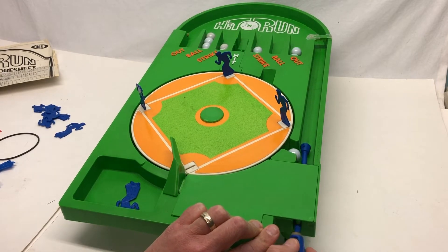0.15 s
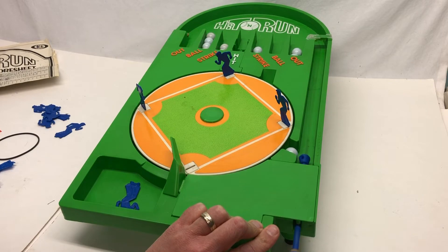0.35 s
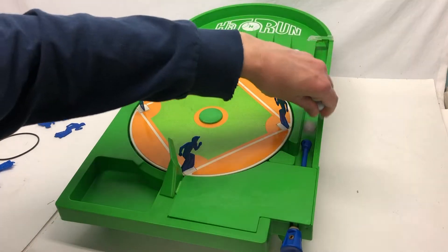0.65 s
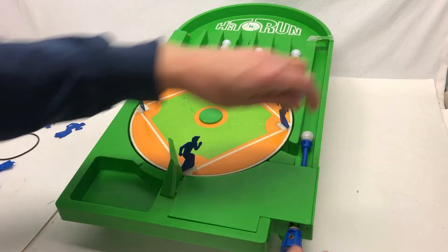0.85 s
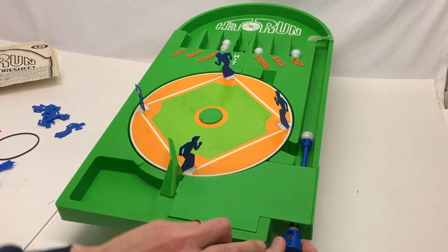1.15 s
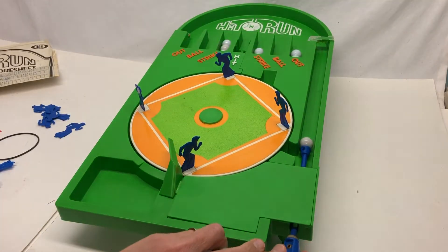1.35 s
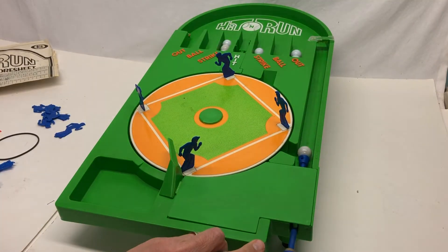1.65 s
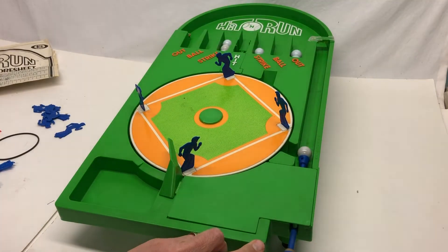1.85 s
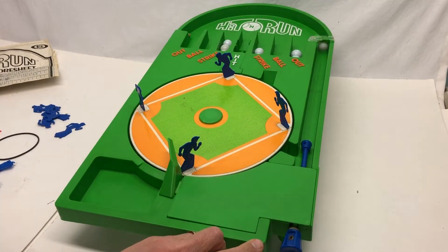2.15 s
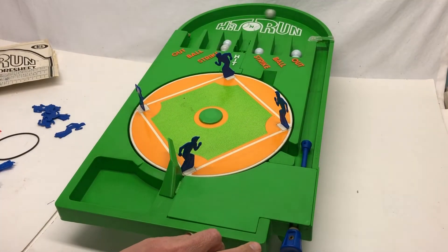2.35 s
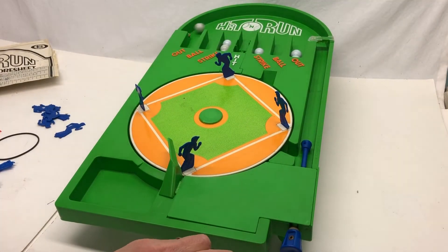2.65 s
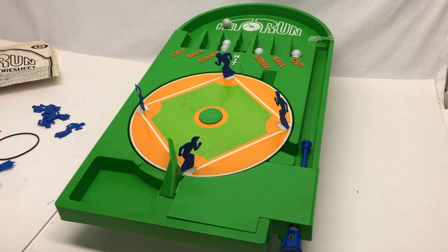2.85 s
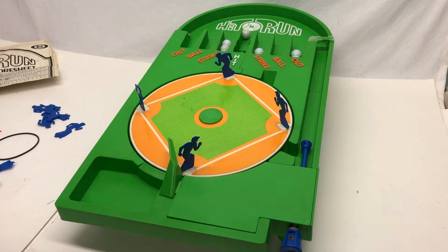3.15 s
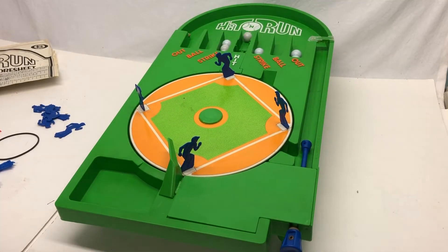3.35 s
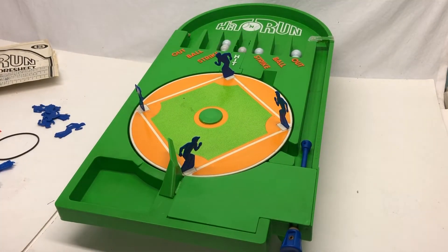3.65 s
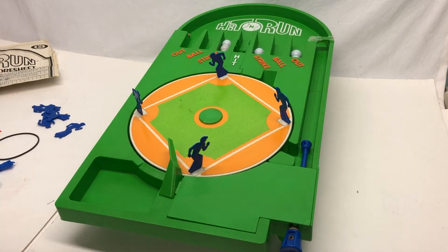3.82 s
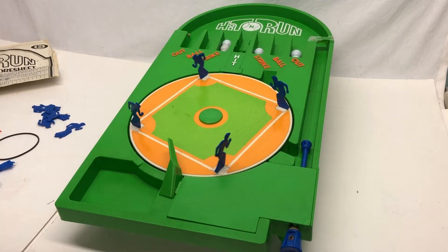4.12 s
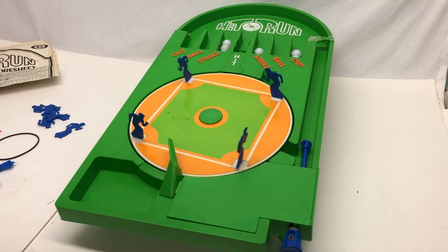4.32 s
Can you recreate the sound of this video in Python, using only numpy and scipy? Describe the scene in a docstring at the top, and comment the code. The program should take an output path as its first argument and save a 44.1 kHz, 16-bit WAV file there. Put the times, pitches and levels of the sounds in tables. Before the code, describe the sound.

Close up in a small quiet room, a sleeve rustles and a plastic shooter clicks. A marble drops in its lane with quick bounces. After a near-quiet pause the spring plunger fires with a rattling snap, the marble rolls round the arch, slows, knocks between plastic dividers, and a turntable trips with hollow clacks over a faint low hum.

```python
"""A plastic tabletop pinball baseball game, heard close up in a small room with a low hum.
A sleeve rustles (shaped noise) while the spring shooter clicks, snaps and is cocked; a marble drops
in its lane and bounces. The shooter fires, the marble rolls round the arch (speed-driven noise),
knocks between the dividers, then trips the turntable that moves the runners.
Each blow mixes noise, fading band by band, with the ringing notes of the thin plastic tray."""
import sys
import numpy as np
from scipy import signal
from scipy.fft import rfft, irfft, next_fast_len
from scipy.io import wavfile
from scipy.ndimage import map_coordinates

SR = 44100
rng = np.random.default_rng(int(sys.argv[2]) if len(sys.argv) > 2 else 0)


def waveform_to_disk(signal):
    """Save audio, clipped to [-1, 1], as 16-bit WAV at the path in sys.argv[1]."""
    frames = np.transpose(np.atleast_2d(signal))
    scaled = np.clip(frames, -1, 1) * 32767
    samples = np.round(scaled).astype(np.int16)
    wavfile.write(sys.argv[1], SR, samples)


N = 197580  # length of the scene in samples

# Blows on the tray. Columns: t/s, relative level/dB, hardness/dB (harder is brighter)
# The shooter's plunger clicks in its guide
PLUNGER_CLICKS = [(0.0062, -35.5, 2.5), (0.169, -31, -1.5), (0.3182, -40, -0.5), (0.9283, -59, 6.5),
                  (0.9527, -56, 6), (1.2261, -44.5, -0.5), (1.259, -44, -10)]
# Hard plastic snaps against plastic
PLASTIC_SNAPS = [(0.2603, -39, 0), (1.4995, -38, 1.5), (2.1448, -36.5, -1)]
# The marble falls in the lane and bounces
MARBLE_DROP = [(0.6215, -24, -2), (0.6365, -26.5, 1), (0.6554, -20.5, 2.5), (0.7, -35, -4),
               (0.7203, -26, 3.5), (0.7487, -31, -1), (0.7675, -43.5, 4.5), (0.796, -54, 5),
               (0.808, -52, -3)]
# Loose parts under the board, mostly the turntable
LOOSE_CLACKS = [(1.131, -39, -8), (3.692, -37.5, -6.5), (3.7218, -29, -1), (3.7469, -29.5, 1),
                (3.779, -38, -6), (3.8314, -39, 3), (3.854, -35, -11), (3.892, -44.5, -12),
                (3.915, -34, -15), (3.9562, -24.5, 3.5), (3.981, -36, 5), (3.9946, -26.5, 3.5),
                (4.0161, -25.5, 0), (4.025, -49, 19), (4.049, -39.5, -0.5), (4.087, -37.5, -4.5),
                (4.1625, -40.5, -13.5), (4.204, -53, -9), (4.2262, -35.5, -7), (4.299, -48.5, -19),
                (4.377, -55, -7), (4.44, -46, -10)]
# The plunger flies forward and chatters
PLUNGER_SHOT = [(1.947, -49.5, -1.5), (1.979, -34, 1.5), (1.988, -26, 2.5), (1.9945, -28, -3),
                (2.006, -27.5, 2.5), (2.018, -31.5, 2.5), (2.029, -37.5, 1.5)]
# The marble hits rim and dividers
MARBLE_KNOCKS = [(2.0697, -41, 7), (2.1375, -41.5, 13), (2.199, -38.5, 6), (2.237, -36, -15),
                 (2.2887, -37, -6), (2.395, -32.5, 0.5), (2.4264, -35.5, 1), (2.5187, -33.5, 2),
                 (2.5446, -37.5, -10), (2.597, -35, -17), (2.6628, -24, 6.5), (2.685, -29, 3.5),
                 (2.7546, -40, -2.5), (2.909, -44, -4), (2.9198, -41.5, -1), (3.014, -56, -2),
                 (3.0664, -45, -4.5), (3.1504, -26.5, 0.5), (3.2003, -19, 0.5), (3.215, -39, 5.5),
                 (3.26, -69, 21), (3.3049, -30, -4), (3.5845, -42.5, 7.5), (3.6007, -28.5, -3),
                 (3.6451, -21, -1.5), (3.66, -33.5, 3)]

# The tray's four bands: knock, body, crack and tick. Columns: low f/Hz, high f/Hz
TRAY_BANDS = [(120, 700), (700, 2200), (2200, 7000), (7000, 17000)]
# Slow bending waves arrive late and last long; one row per band.
# Columns: rise/s, time to fall 60 dB/s (before each part's own damping)
BENDING_WAVES = [(0.0074, 0.087), (0.0051, 0.065), (0.0011, 0.064), (.00025, 0.052)]
# The tray's ringing notes. Columns: f/Hz, relative level/dB, time to fall 60 dB/s
TRAY_NOTES = [(363.2, -4.5, 0.17), (535.4, -6.5, 0.15), (654, -15, 0.071), (882, -9.5, 0.28),
              (920, -2, 0.12), (1070, -2.5, 0.066), (1320, -2, 0.028), (1323, -1.5, .09),
              (1510, -18.5, 0.045), (2140, -9.5, 0.059), (2420, -6, 0.09), (2370, -12.5, 0.11),
              (3560, -17.5, .08), (3970, -20, 0.039), (4900, -13, 0.06), (4800, -25.5, .08)]

# Tone colours of the blows and noises. Columns: f/Hz, relative level/dB
# Still room air
AIR_COLOUR = [(15, -28.5), (25, -0.5), (92, -14.5), (200, 10.5), (384, 2), (451, -5), (1100, -11.5),
              (7920, -16.5), (13200, -17), (14400, -22.5), (16000, -42)]
# Sleeve cloth
CLOTH_COLOUR = [(60, -28), (110, -12.5), (190, -13.5), (380, -2.5), (470, -8), (620, -9.5), (1050, -12),
                (1650, -15), (2080, -16), (2700, -21.5), (4400, -18), (5300, -25.5), (9500, -33.5),
                (16000, -44.5)]
# Plunger clicks
CLICK_COLOUR = [(150, -45), (250, -19), (618, -8.5), (875, -0.5), (2440, -13.5), (3840, -7.5), (4410, -15),
                (4820, -4), (5440, -11), (6250, -8), (8120, -25.5), (9330, -21.5), (13000, -36),
                (14700, -37), (16000, -36.5)]
# Plastic snaps
SNAP_COLOUR = [(250, -14), (380, -4), (1100, -2), (2000, -3.5), (2550, -13), (3000, 3.5), (3500, -2),
               (4000, 4), (5000, -5.5), (6600, -5.5), (8200, -11.5), (11500, -10), (14000, -3),
               (16000, -11)]
# Marble drop
DROP_COLOUR = [(88, -61), (150, -31), (534, -10), (790, -11), (854, -4.5), (1210, -6.5), (1830, -9.5),
               (2180, -20), (3490, -10), (4160, -14.5), (4950, -8), (5910, -19.5), (6910, -12.5),
               (14000, -27), (16000, -31)]
# Loose parts
CLACK_COLOUR = [(120, -45), (200, -18.5), (416, 1), (612, -3.5), (1270, 0.5), (1480, -19), (2020, -11.5),
                (2170, -20), (2380, -24), (3490, -26.5), (4120, -26.5), (4770, -31), (6640, -32.5),
                (8420, -37), (16000, -48)]
# Plunger shot
SHOT_COLOUR = [(88, -57), (150, -32), (376, -11), (457, -16), (534, 2.5), (871, -15), (998, 1.5),
               (1100, -14.5), (2400, -11.5), (2600, -2.5), (2760, -14), (3040, -1.5), (3550, -8.5),
               (4580, -6), (16000, -24)]
# Rumble of the rolling marble
ROLL_COLOUR = [(60, -46.5), (170, -9), (280, -22.5), (360, -0.5), (450, -4), (560, 2), (900, -3.5),
               (1300, 0), (1700, -7), (2400, -10), (3200, -8), (5000, -43.5)]
# Grit of rolling and rubbing
GRIT_COLOUR = [(1180, -53), (2000, -4), (2640, -6), (3710, 2.5), (4050, 1), (6640, -3), (8400, -10.5),
               (14700, -23), (16000, -24)]
# Marble knocks
KNOCK_COLOUR = [(88, -59), (150, -56), (354, -23), (759, -4.5), (888, 11.5), (1140, 6), (1450, 0),
                (1940, 0.5), (2700, -14), (4080, -11), (4490, -14.5), (6510, -19), (9440, -28),
                (15100, -35), (16000, -41)]
# Rumble of rubbing parts
RUB_COLOUR = [(100, -35), (250, -7), (380, -0.5), (950, 3.5), (1400, -9), (2400, -6.5), (5000, -34)]
# Hiss of sliding plastic
SWISH_COLOUR = [(800, -34.5), (2000, 3.5), (4500, 3.5), (6800, -3.0), (8300, -6), (11000, -8.5),
                (16000, -15.5)]
# Level of the room's tail
ROOM_COLOUR = [(200, -10), (1000, -14.0), (4000, -13.5), (14000, -15)]

# Sounds that swell and fade. Columns: peak t/s, level/dB, rise/s, fall/s (both over 20 dB)
# The low hum
HUM_SWELLS = [(0.0, -59, 0.1, 0.4), (1.56, -64.5, 0.15, 0.45), (2.1, -68, 0.2, 1.7),
              (4.28, -58.5, 0.95, 0.46)]
# The spring rubs while it is held
SPRING_SWELLS = [(0.86, -58.5, 0.05, 0.53), (1.52, -62.5, 0.41, 0.31)]
# The plunger, then the turntable, rub on the tray
RUB_SWELLS = [(2.0, -31.5, 0.048, 0.059), (3.97, -41, 0.1, 0.12), (4.28, -59.5, 0.32, 3.6)]
# Faint, smooth slides of plastic
SWISH_SWELLS = [(3.46, -62, 0.087, 0.11), (4.3, -72.5, 2.7, 3)]

# Sleeve and hands on the toy. Columns: start t/s, end t/s, relative level/dB, time to fade 60 dB/s
SLEEVE_RUSTLE = [(0.0, 0.396, -56, 0.018), (0.795, 1.512, -53.5, 0.79)]
# Soft bumps of hand and tray on the table. Columns: t/s, relative level/dB, starting f/Hz
SOFT_BUMPS = [(0.659, -38.5, 190), (0.661, -37, 95), (0.72, -31.5, 81), (0.793, -32.5, 265),
              (.859, -29.5, 345), (0.87, -32, 229), (.879, -34, 128), (1.502, -60.5, 80),
              (1.998, -46.5, 120), (2.008, -33.5, 65), (2.613, -21, 432), (2.663, -38, 131),
              (2.691, -39.5, 70)]
# On the hardest blows the struck wall sounds its own note. Columns: t/s, level/dB, f/Hz
WALL_NOTES = [(0.6228, -9, 2580), (0.6551, -8, 5140), (0.72, -13, 5170), (3.153, -15, 2300),
              (3.201, -19.5, 1193), (3.6451, -14, 2370)]
# The turntable's stiff lever trips. Columns: t/s, peak level/dB, f/Hz
LEVER_TRIPS = [(3.7224, -10, 1450), (3.7395, -12.5, 1410), (3.7467, -13, 1730), (3.956, -13.5, 1400),
               (3.9938, -13, 1300), (4.0167, -14, 1300), (4.05, -19.5, 1190), (4.163, -37.5, 1030),
               (4.2268, -31, 1270)]
# The marble rounds the arch, slows at the top and drops through the dividers.
# Columns: t/s, share of full speed
MARBLE_SPEED = [(1.97, 0.11), (2.03, 0.96), (2.17, 0.78), (2.42, 0.54), (2.625, 0.76), (2.655, 0.33),
                (2.7, 0.45), (2.87, 0.38), (2.97, 0.19), (3.025, 0.26), (3.1, 0.21), (3.45, 0.062),
                (3.56, 0.21), (3.9, 0.13), (4.15, 0.11)]
# How long the room's tail lasts. Columns: f/Hz, time to fall 60 dB/s
ROOM_FADE = [(150, 0.5), (1000, 0.28), (4000, 0.16), (14000, 0.15)]


def amp(db):
    """Decibels to gain."""
    return 10 ** (np.asarray(db) / 20)


def unit(x):
    """Scaled to an rms of 1."""
    return x / np.sqrt(np.mean(x ** 2) + 1e-20)


def along(points, hz):
    """(f/Hz, value) points read on a logarithmic frequency axis."""
    f, v = np.transpose(points)
    return np.interp(np.log(hz + 1), np.log(f + 1), v)


def wobble(rate):
    """A smooth random curve through `rate` random points a second."""
    points = rng.standard_normal(int(N * rate / SR) + 4)
    return map_coordinates(points, [np.arange(N) * rate / SR])


def filtered(x, response):
    """x with each frequency scaled by response(Hz)."""
    n = x.shape[-1]
    m = next_fast_len(n + 4096)
    return irfft(rfft(x, m) * response(np.fft.rfftfreq(m, 1 / SR)), m)[..., :n]


def coloured(x, tone):
    """x with the given tone colour, at an rms of 1."""
    return unit(filtered(x, lambda hz: amp(along(tone, hz))))


def noise(tone):
    """Steady random noise of the given tone colour, at an rms of 1."""
    return coloured(rng.standard_normal(N), tone)


def add(out, s, x):
    """Mixes x into out at time s."""
    i = max(round(s * SR), 0)
    out[i:i + len(x)] += x[:max(N - i, 0)]


def swells(rows):
    """A gain curve: each row rises to its peak and falls away, straight in dB."""
    t = np.arange(N) / SR
    return sum(amp(db - 20 * np.maximum((s - t) / rise, (t - s) / fall)) for s, db, rise, fall in rows)


def radiated(x, small_hz=190):
    """The tray is too small to radiate deep bass."""
    return signal.sosfilt(signal.butter(2, small_hz, 'high', fs=SR, output='sos'), x)


def contacts(rows, tone, balance_db, damping, ring_db, sharp, crack_s, alike=0.49, tick_grows=1.37):
    """Blows excite a sharp crack, a dense wash dying band by band, and the tray's long notes."""
    out, t = np.zeros(N), np.arange(SR // 4) / SR
    head = t < .014  # levels are set over the first 14 ms
    place = rng.standard_normal(len(t))  # pattern shared by blows on one part
    hz, note_db, note_t60 = np.transpose(TRAY_NOTES)[:, :, None]
    knock, crack, tick = balance_db  # relative to the body band
    for s, body_db, hard_db in rows:
        # Hardness lifts the tick more than the crack
        band_db = body_db + np.array([knock, 0, crack + hard_db, tick + tick_grows * hard_db])
        own = rng.standard_normal(len(t))
        wash = coloured(alike * place + np.sqrt(1 - alike ** 2) * own, tone)
        blow = np.zeros(len(t))
        for (lo, hi), (rise, t60), db in zip(TRAY_BANDS, BENDING_WAVES, band_db):
            fall = amp(-60 * t * damping / t60) + sharp * amp(-60 * t / crack_s)
            band = filtered(wash, lambda f: (f >= lo) & (f < hi))
            part = band * fall * (1 - np.exp(-t / rise))
            blow += amp(db) * part / np.std(part[head])
        # Each blow excites the notes a little differently
        strength = amp(note_db + rng.normal(0, 3.5, hz.shape) - 60 * t / note_t60)
        notes = strength * np.sin(2 * np.pi * (hz * t + rng.random(hz.shape)))
        ring = np.sum(notes, axis=0) * (1 - np.exp(-t / 0.009))
        blow += amp(np.mean(band_db[:2]) + ring_db) * ring / np.std(ring[head])
        add(out, s, blow)
    return radiated(out)


def air(floor_db=-74, hum_hz=76, width_hz=14, octave_db=-6):
    """Still room air is soft noise; narrow noise bands make a low, wavering hum and its octave."""
    def line(f, hz):
        """A narrow peak around hz."""
        return 1 / (1 + ((f - hz) / width_hz) ** 2)

    def both_lines(f):
        """The hum and its octave."""
        return line(f, hum_hz) + amp(octave_db) * line(f, 2 * hum_hz)

    hum = unit(filtered(rng.standard_normal(N), both_lines))
    return amp(floor_db) * noise(AIR_COLOUR) + swells(HUM_SWELLS) * hum


def hands(rustle_db=1, bump_db=4.5, sag=0.33, bump_t60=0.044):
    """Cloth rubs unevenly over the toy, and soft, rough bumps sink in pitch as they fade."""
    now, t = np.arange(N) / SR, np.arange(SR // 6) / SR
    level = sum((now >= start) * amp(db - 60 * np.maximum(now - end, 0) / t60)
                for start, end, db, t60 in SLEEVE_RUSTLE)
    out = level * amp(rustle_db + 3.0 * wobble(43)) * noise(CLOTH_COLOUR)
    for s, db, hz in SOFT_BUMPS:
        sinking_hz = hz * (1 - sag * (1 - np.exp(-t / 0.015)))
        rough = 1 + .35 * wobble(130)[:len(t)]
        thud = np.sin(2 * np.pi * np.cumsum(sinking_hz) / SR) * rough
        fade = amp(db + bump_db - 60 * t / bump_t60)
        add(out, s, fade * thud * (1 - np.exp(-t / 0.0076)))
    return out


def plunger_clicks():
    """The plunger clicks in its guide with strongly damped blows."""
    return amp(-2.0) * contacts(PLUNGER_CLICKS, CLICK_COLOUR, balance_db=(-12, 0, -7), damping=1.7,
                                ring_db=-7.0, sharp=0.72, crack_s=0.0096)


def plastic_snaps():
    """Hard plastic meets plastic: bright blows with a strong crack and tick."""
    return amp(-1.5) * contacts(PLASTIC_SNAPS, SNAP_COLOUR, balance_db=(-10.5, 12.5, 8.5), damping=1.5,
                                ring_db=-8.5, sharp=0.8, crack_s=0.017)


def marble_drop():
    """The marble bounces in its lane, each landing a sharp crack with a longer wash."""
    return amp(-1.5) * contacts(MARBLE_DROP, DROP_COLOUR, balance_db=(-8, -1.5, -9), damping=0.63,
                                ring_db=-8.5, sharp=5.2, crack_s=0.014)


def walls(t60=0.011):
    """Each small stiff wall rings briefly at one pitch."""
    out, t = np.zeros(N), np.arange(SR // 12) / SR
    for s, db, hz in WALL_NOTES:
        add(out, s, amp(db - 60 * t / t60) * np.sin(2 * np.pi * hz * t))
    return radiated(out)


def spring(sing_hz=2050, width_hz=220):
    """The stretched spring rubs in its guide with a faint, narrow hiss."""
    hiss = filtered(rng.standard_normal(N), lambda f: 1 / (1 + ((f - sing_hz) / width_hz) ** 2))
    return swells(SPRING_SWELLS) * unit(hiss)


def turntable(lever_t60=0.0043, swing_rise=0.001):
    """Loose parts clack on the tray; the well damped lever swings a few strong cycles per trip."""
    out = amp(-2) * contacts(LOOSE_CLACKS, CLACK_COLOUR, balance_db=(-11.5, -5, -18), damping=0.68,
                             ring_db=-31, sharp=4.1, crack_s=0.019)
    t = np.arange(SR // 25) / SR
    for s, db, hz in LEVER_TRIPS:
        onset = 1 - np.exp(-(t / swing_rise) ** 2)
        swing = np.sin(2 * np.pi * hz * t) * amp(-60 * t / lever_t60) * onset
        add(out, s, amp(db) * swing / np.abs(swing).max())
    return out


def plunger_shot():
    """The plunger flies forward and chatters in a quick run of blows."""
    return amp(-1.6) * contacts(PLUNGER_SHOT, SHOT_COLOUR, balance_db=(-10, 0, -8), damping=0.81,
                                ring_db=-14.5, sharp=0.42, crack_s=0.015)


def rubbing(grit_db=-7, rough_db=3.0):
    """Plunger and turntable slide on the tray with a rough rumble and some grit."""
    rumble, grit = noise(RUB_COLOUR), noise(GRIT_COLOUR)
    return swells(RUB_SWELLS) * amp(rough_db * wobble(120)) * (rumble + amp(grit_db) * grit)


def rolling(focus_db=13, soft_db=4.0, octaves=0.41, rumble_db=-34.0, grit_db=-38, bump_rate=170,
            uneven_db=1.6, full_speed_hz=1190, pitch_power=0.51, rumble_power=1.26, grit_power=3.08):
    """Tiny bumps under the marble make the tray rumble, lower and softer as it slows, and crackle."""
    now, t = np.arange(N) / SR, np.arange(SR // 40) / SR
    speed = np.maximum(np.interp(now, *np.transpose(MARBLE_SPEED), left=0, right=0), 1e-3)
    # Random bumps, bump_rate a second on average, each with a short tail
    bump_size = amp(3.3 * np.minimum(rng.exponential(size=N), 3))
    bumps = (rng.random(N) < bump_rate / SR) * bump_size
    energy = signal.fftconvolve(bumps ** 2, amp(-120 * t / 0.02))[:N]
    chatter = unit(np.sqrt(np.abs(energy + 0.1)))
    hz, when, z = signal.stft(noise(ROLL_COLOUR), SR, nperseg=1024)
    pace = np.interp(when, now, speed)
    centre_hz = full_speed_hz * pace ** pitch_power
    above = np.log2((hz[:, None] + 1) / centre_hz)  # octaves above the centre
    # A slow marble meets the bumps softly and leaves the higher notes alone
    focus_shape = focus_db * np.exp(-(above / octaves) ** 2) - soft_db * np.maximum(above, 0)
    focused = z * amp((1 - 0.58 * pace) * focus_shape)
    even = focused / np.linalg.norm(focused, axis=0)  # equal level at every moment
    tone = signal.istft(even, SR, nperseg=1024)[1][:N]
    rumble = amp(rumble_db) * speed ** rumble_power * unit(tone * chatter ** 0.39)
    # Grit fades much faster than the rumble as the marble slows
    grit = amp(grit_db) * speed ** grit_power * chatter * noise(GRIT_COLOUR)
    return amp(uneven_db * wobble(35)) * (rumble + grit)


def marble_knocks():
    """The marble strikes rim and dividers, adding sharp cracks to the tray's wash."""
    return amp(-3.5) * contacts(MARBLE_KNOCKS, KNOCK_COLOUR, balance_db=(-11, -6, -19), damping=0.87,
                                ring_db=-10.5, sharp=3.5, crack_s=0.015)


def swishes():
    """Smooth plastic slides with a faint hiss."""
    return swells(SWISH_SWELLS) * noise(SWISH_COLOUR)


def room(x):
    """Reflections form a noisy tail, each frequency dying at its own speed."""
    hz, t, z = signal.stft(rng.standard_normal(SR // 2), SR, nperseg=256)
    fading = z * amp(-60 * t / along(ROOM_FADE, hz)[:, None])
    tail = signal.istft(fading, SR, nperseg=256)[1]
    tail *= 1 - np.exp(-np.arange(len(tail)) / SR / 0.00093)  # soft start
    wet = signal.fftconvolve(x, tail / np.linalg.norm(tail))[:N]
    return filtered(wet, lambda f: amp(along(ROOM_COLOUR, f)))


def scene():
    """Shooter, marble and turntable share one tray in the room, with hands and air alongside."""
    shooter = plunger_clicks() + plastic_snaps() + spring() + plunger_shot()
    marble = marble_drop() + walls() + rolling() + marble_knocks()
    toy = shooter + marble + turntable() + rubbing() + swishes()
    return (toy + room(toy) + hands() + air())[None]


def record(dry, low_cut_hz=55, top_hz=16100):
    """Rolls off the deep bass gently and cuts the highest treble steeply."""
    lean = filtered(dry, lambda hz: hz ** 2 / np.hypot(hz ** 2, low_cut_hz ** 2))
    return filtered(lean, lambda hz: 1 / (1 + (hz / top_hz) ** 120))


dry = scene()
out = record(dry)
waveform_to_disk(out)
```